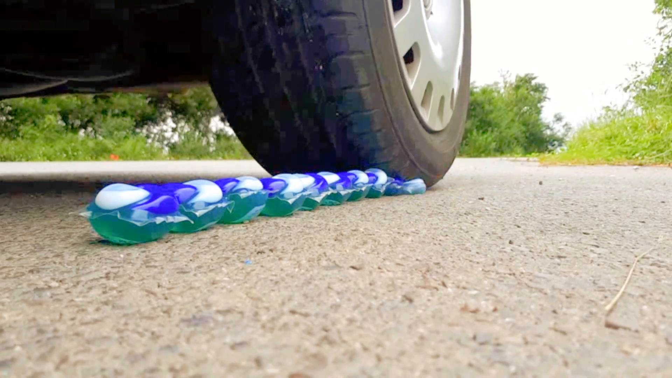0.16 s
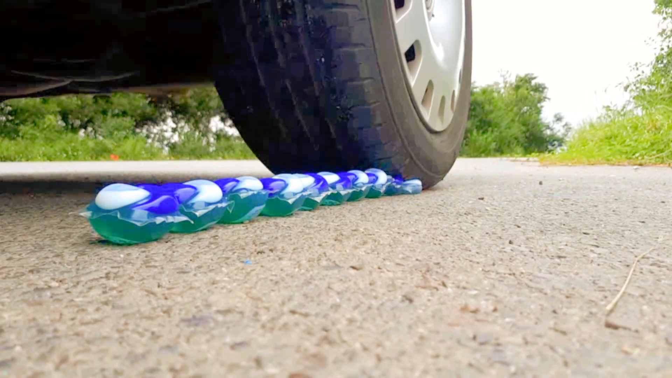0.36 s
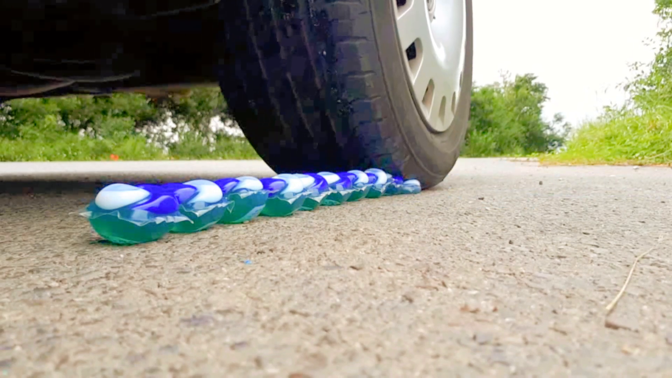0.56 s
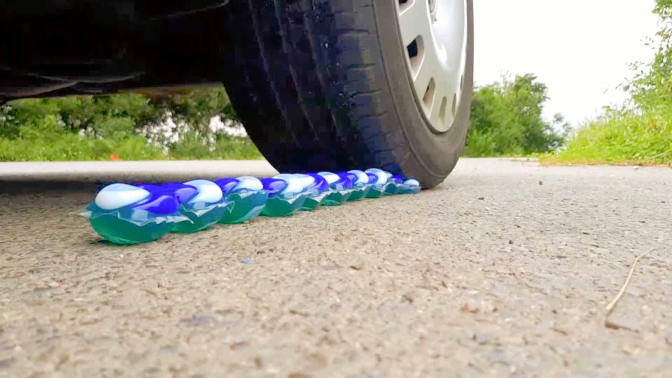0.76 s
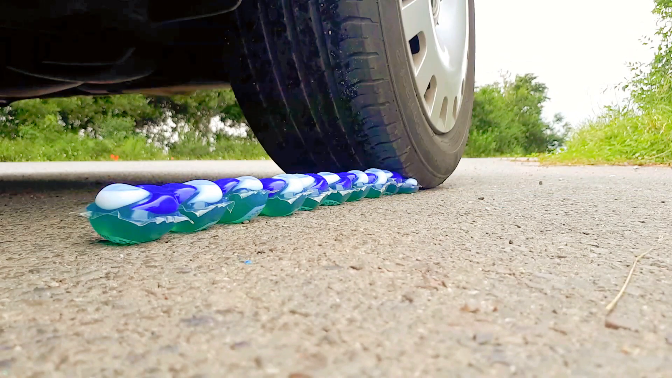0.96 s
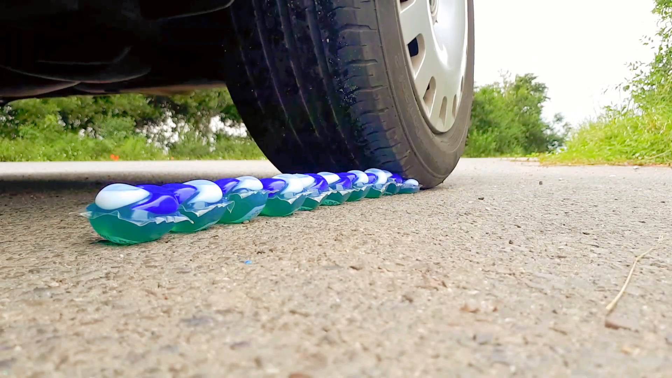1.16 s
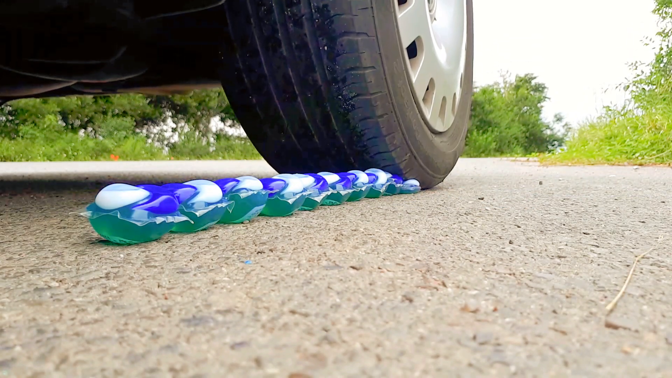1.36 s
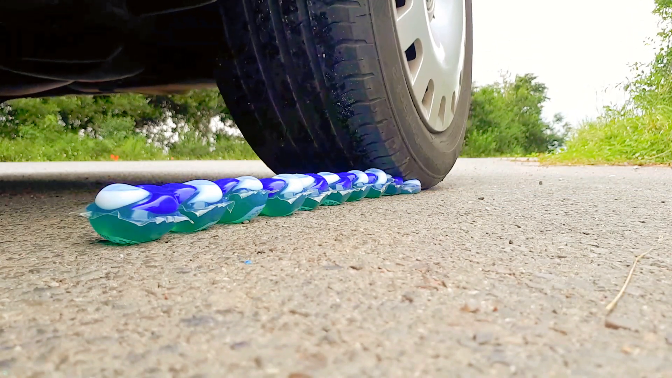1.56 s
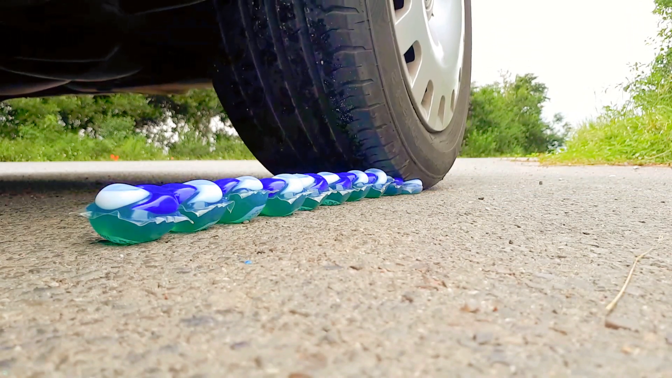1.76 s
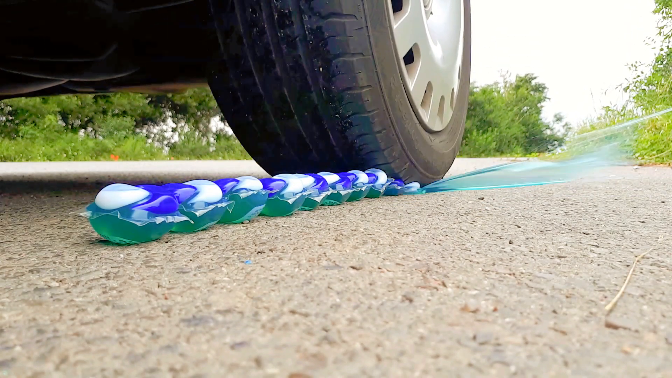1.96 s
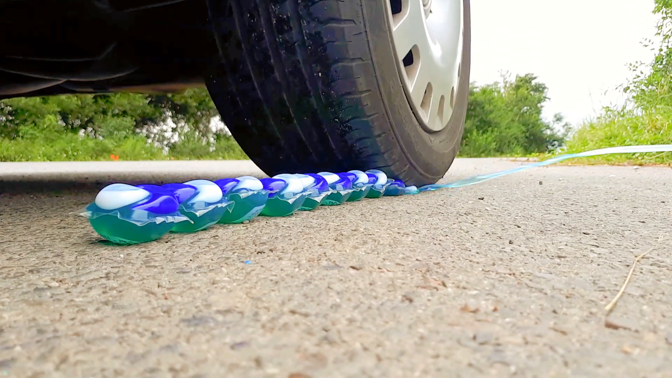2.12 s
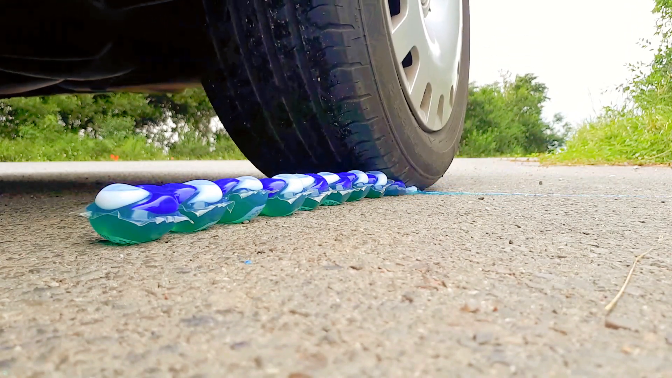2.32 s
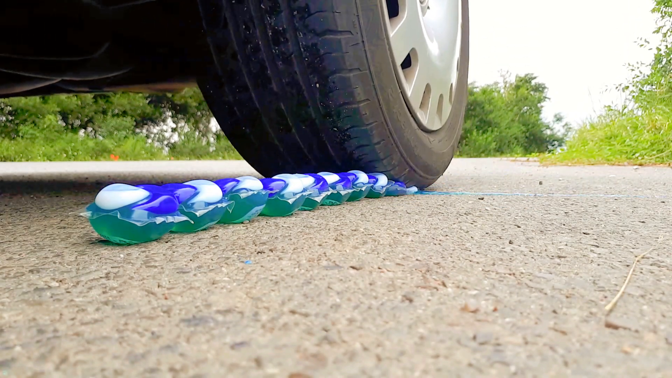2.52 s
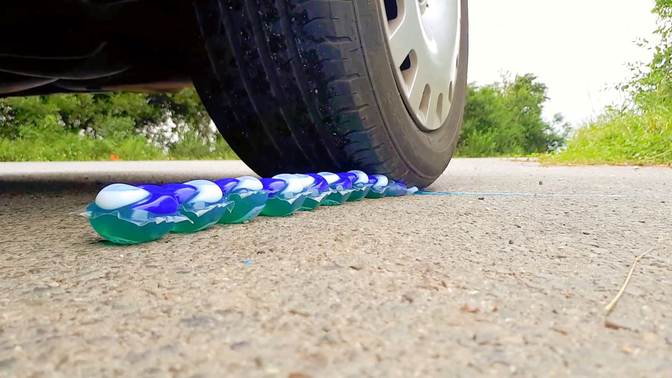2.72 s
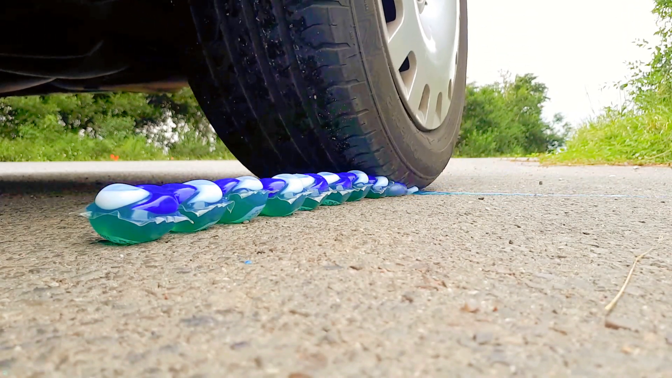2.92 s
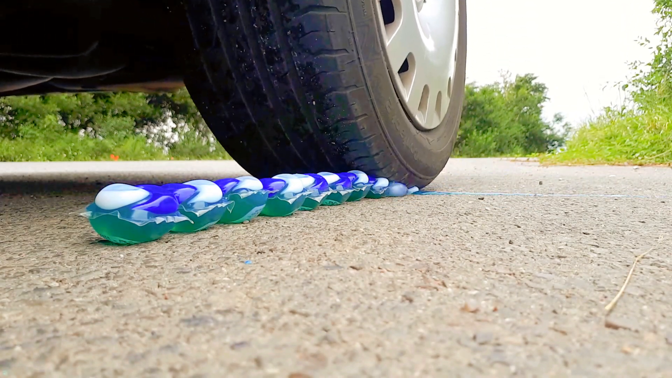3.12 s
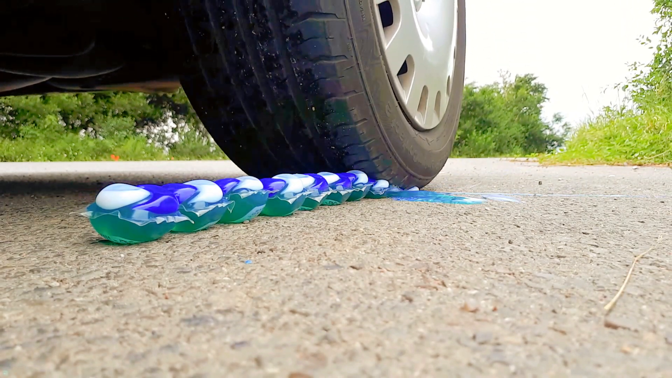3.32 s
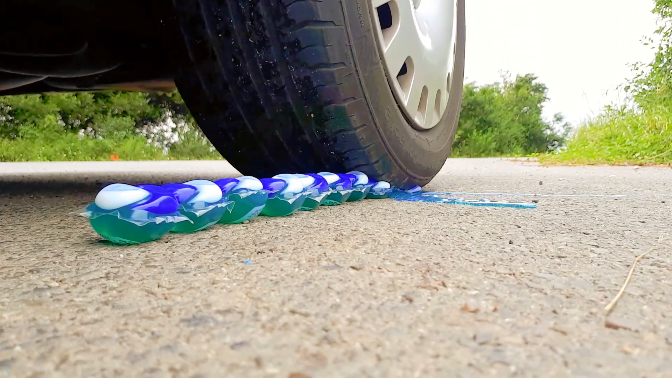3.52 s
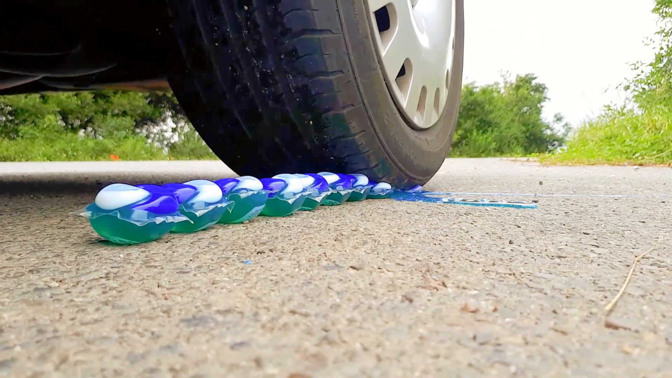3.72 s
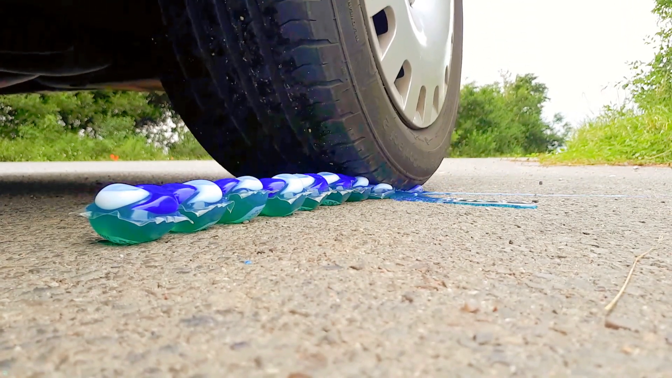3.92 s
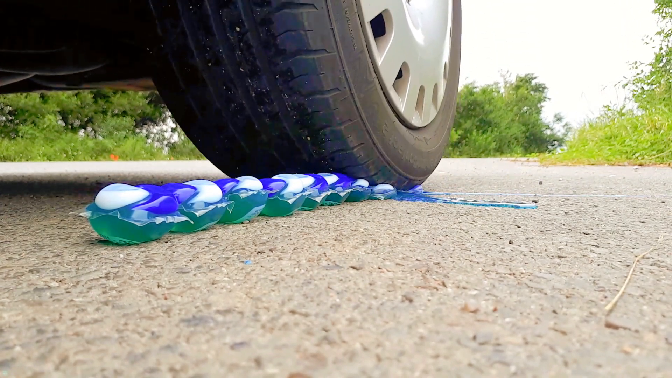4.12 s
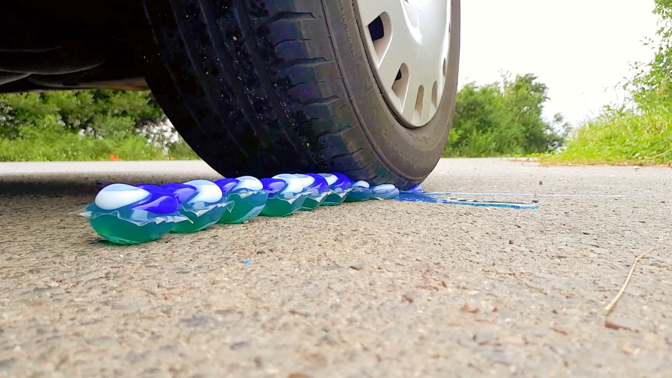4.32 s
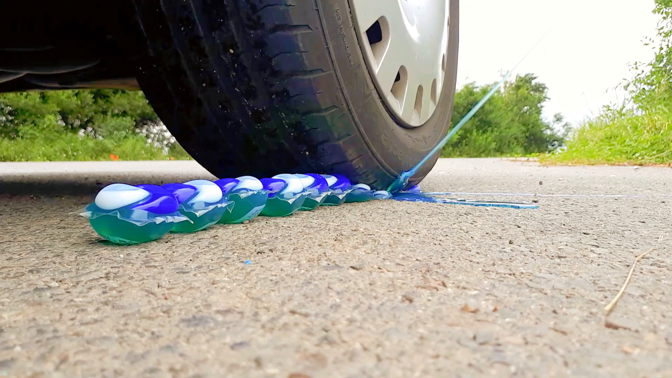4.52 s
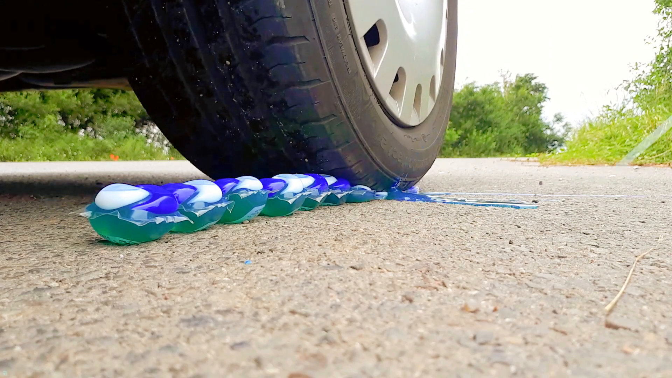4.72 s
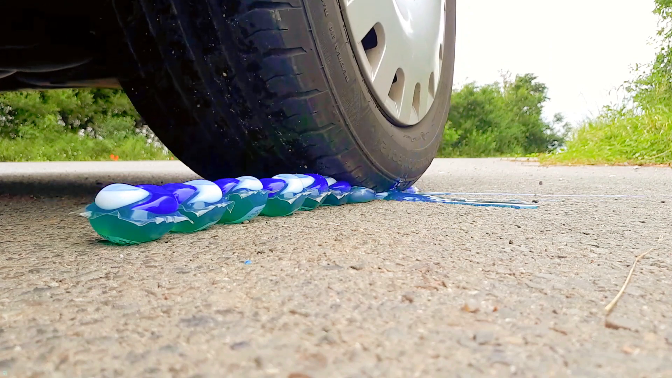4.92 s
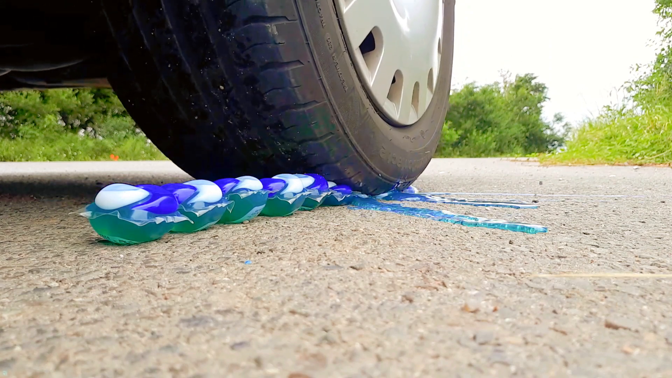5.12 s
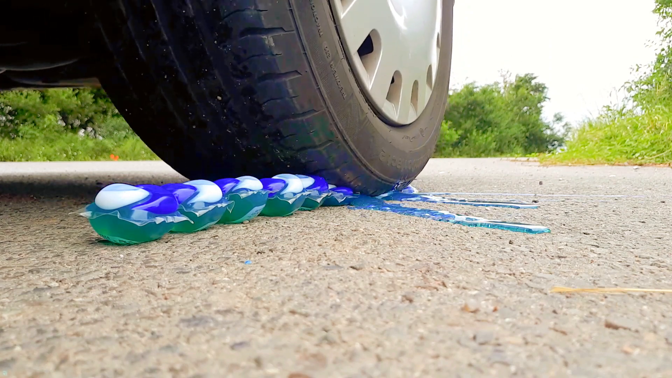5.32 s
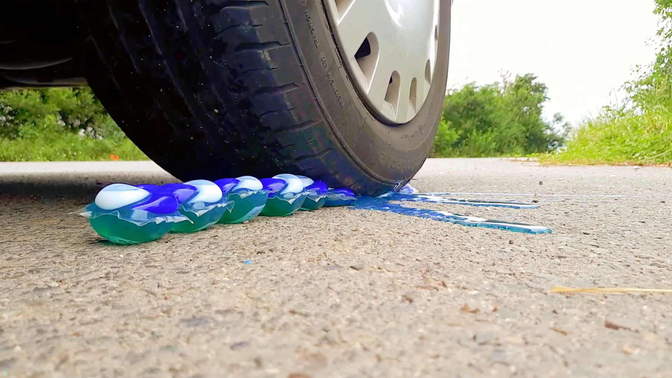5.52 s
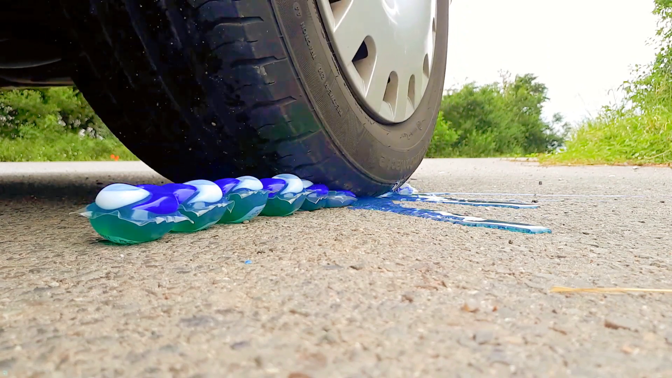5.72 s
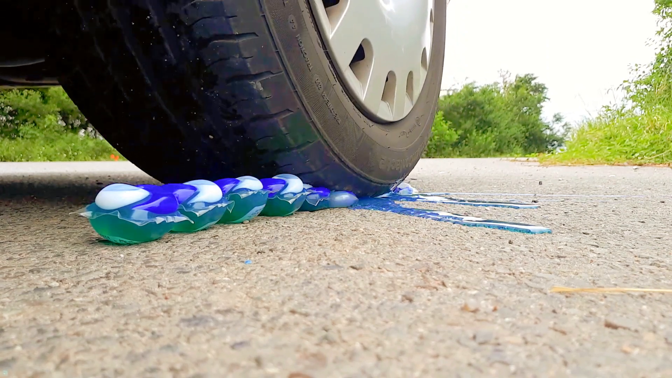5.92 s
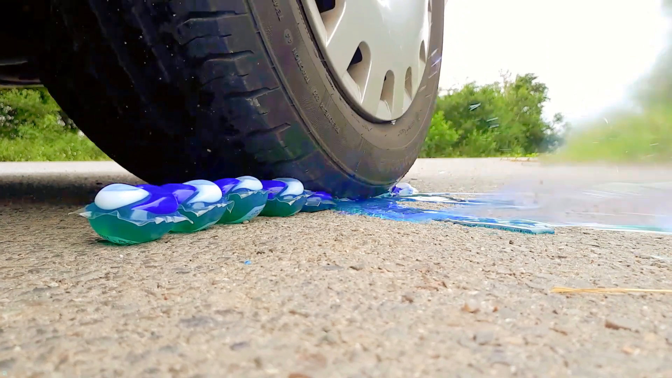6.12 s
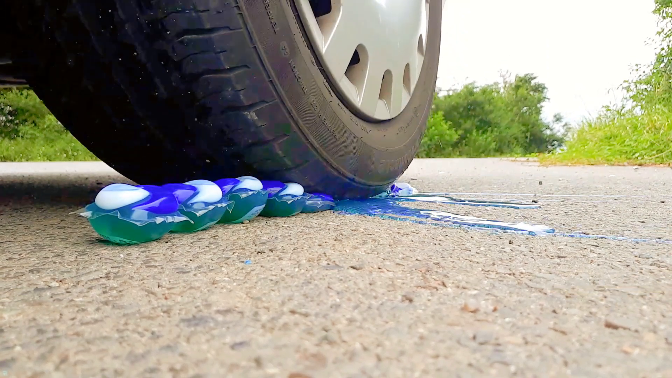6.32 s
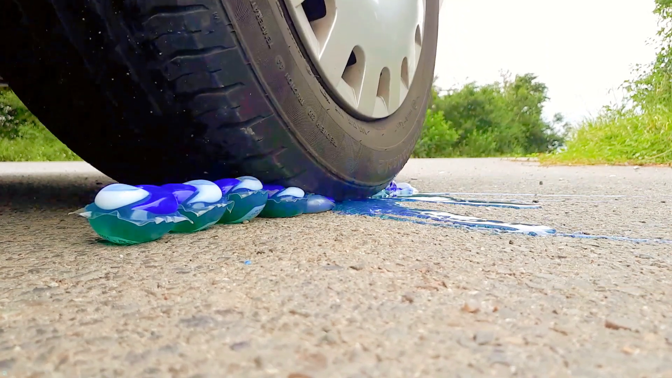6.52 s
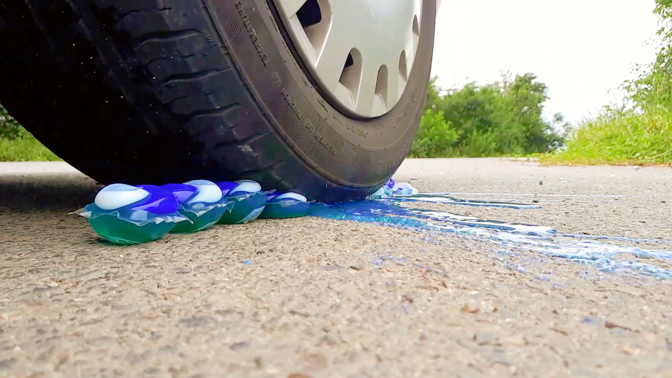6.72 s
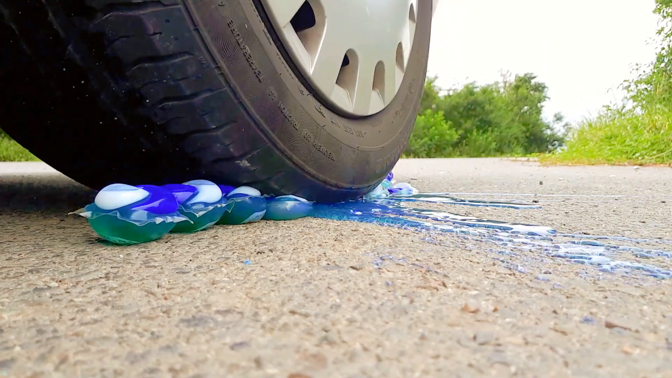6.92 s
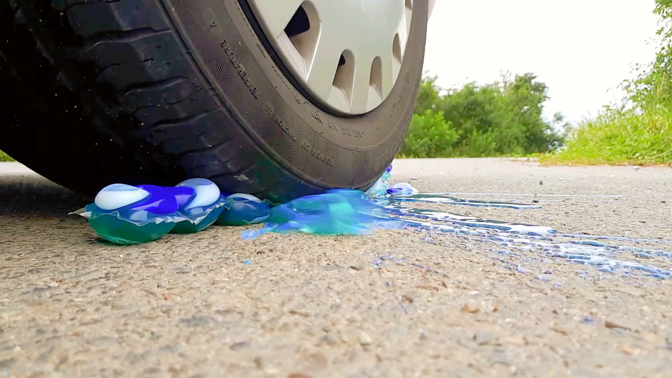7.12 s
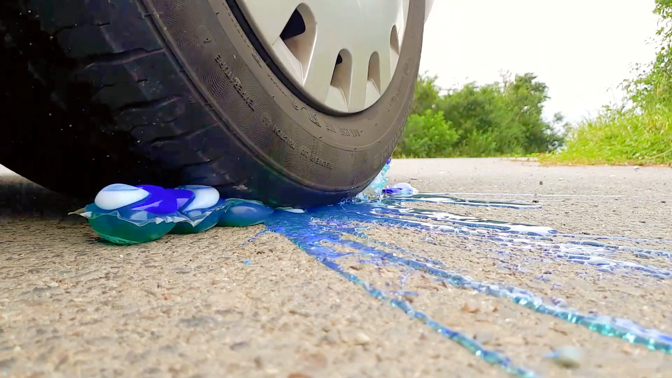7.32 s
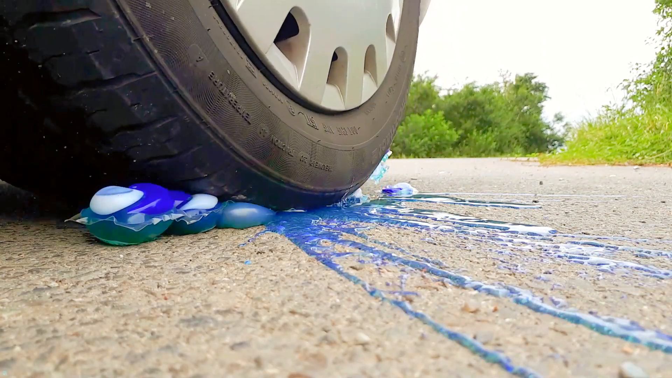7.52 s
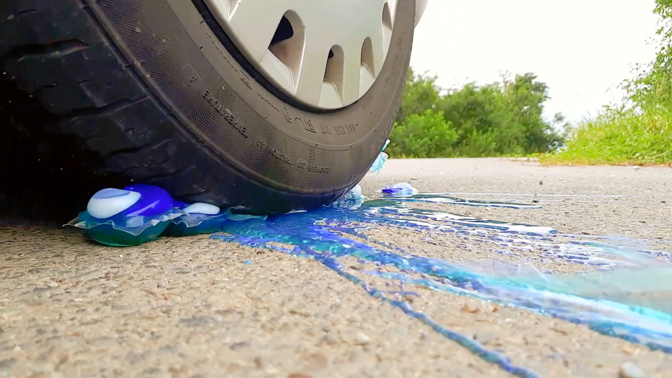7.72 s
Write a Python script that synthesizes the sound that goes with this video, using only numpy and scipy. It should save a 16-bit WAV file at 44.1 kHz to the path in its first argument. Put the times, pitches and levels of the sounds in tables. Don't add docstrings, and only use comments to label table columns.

```python
import sys
import numpy as np
from scipy import signal
from scipy.fft import rfft, irfft, next_fast_len
from scipy.io import wavfile
from scipy.ndimage import uniform_filter1d, map_coordinates

SR = 44100
rng = np.random.default_rng(int(sys.argv[2]) if len(sys.argv) > 2 else 0)


def int16_out(signal):
    q = np.round(np.clip(np.atleast_2d(signal).T, -1, 1) * 32767)
    wavfile.write(sys.argv[1], SR, q.astype(np.int16))


def linear_from_db(decibels):
    return 10 ** (np.asarray(decibels, float) / 20)


N = 346846

# start in seconds, peak in dB, pitch in Hz, echo delay in ms, step per echo in dB.
SNAPS = [(1.77091, -1.5, 2600, .2, -4.5), (1.7786, -9, 2500, .2, -3), (3.10445, -7, 2100, .85, -15),
         (4.1419, -3.5, 2700, .19, -3), (4.15126, -7, 2700, .19, -3.5), (4.84372, -10, 1600, .85, -16),
         (4.85803, -12, 1600, .85, -16), (5.86803, 0, 2100, .86, -14), (5.87706, -7, 2100, .85, -10),
         (6.4121, -5, 2000, .85, -13), (6.93443, -3, 2000, .54, -10), (7.4569, 0, 2000, .85, -14)]
# start in seconds, time until shut in ms, start and end pitch in Hz, level in dB.
WHOOPS = [
    (3.1068, 3.6, 1450, 2300, -7),
    (4.8456, 2.5, 1200, 2750, -9),
    (4.8599, 2.4, 1200, 2750, -9),
    (5.8688, 2.1, 1250, 2950, -8.5),
    (5.8778, 2, 1250, 2950, -10.5),
    (5.8868, 3.5, 1900, 2400, -12),
    (6.4141, 3.2, 1480, 2350, .3),
    (6.9367, 4.9, 1450, 2060, -6.5),
    (6.9432, 4.8, 1500, 2080, -11.5),
    (7.4588, 4.7, 1250, 2560, -13.5),
]
WHOOP_GROWS_DB = [-7, 4.5, 4.5, 6, 5.5, -2, -6, .4, 1.5, 7.5]
# start in seconds, level in dB.
JETS = [
    (1.767, -32.5),
    (3.1, -36),
    (4.138, -20),
    (4.8394, -35.5),
    (4.855, -41.5),
    (5.864, -41),
    (6.407, -36),
    (6.929, -29.5),
    (7.452, -32),
]
# frequency in Hz, level in dB.
JET_COLOUR = [(700, -5), (2000, 0), (4500, -10.5), (6500, -17.5), (8700, -33.5), (12500, -16.5),
              (15800, -23.5)]
# start in seconds, peak in dB, pitch in Hz.
CRACKS = [
    (1.771, -15, 5000),
    (1.7711, -33, 11500),
    (1.779, -25, 5200),
    (3.1074, -27, 4200),
    (4.142, -20, 5800),
    (4.1421, -30, 9500),
    (4.1422, -29, 13000),
    (4.1514, -24, 5600),
    (4.1515, -34, 9500),
    (4.1516, -33, 13000),
]
# start in seconds, peak in dB, pitch in Hz.
SLAPS = [(1.7771, -17.5, 2200), (1.785, -19.5, 2200), (1.7868, -15, 1900), (1.7882, -16, 2200),
         (1.7898, -18, 2200), (1.7912, -17, 2000), (1.7926, -18, 2200), (1.7948, -18, 2300),
         (3.106, -27, 750), (3.1128, -25.5, 800), (4.148, -23, 2900), (4.1575, -18.5, 2900),
         (4.1594, -16.5, 2300), (4.1605, -16.5, 2600), (4.1625, -18.5, 3100), (4.1645, -20.5, 2900),
         (4.1665, -19, 3200), (4.174, -23.5, 3000), (4.18, -25.5, 3000), (4.189, -24.5, 2900),
         (4.2, -27, 2900), (4.204, -25.5, 3000), (4.8445, -23, 650), (4.8588, -23.5, 650),
         (6.4135, -24, 700), (6.936, -23, 700), (7.458, -21, 750), (7.4618, -22.5, 800)]

# start in seconds, then underbody echo, tyre ring, air-cavity note and
# air push, all in dB.
BURSTS = [
    (1.7714, -7, -32.5, -66, -22.5),
    (3.104, -13, -36.5, -55.5, -38),
    (4.14, -3, -26.5, -63, -46),
    (4.8443, -14, -37.5, -53, -49.5),
    (5.869, -9.5, -28.5, -46, -29),
    (6.413, -10.5, -33, -45.5, -40),
    (6.9346, -15, -35.5, -48.5, -40),
    (7.4575, -13, -31, -42, -30.5),
]
# frequency in Hz, level in dB, decay over 60 dB in seconds.
TYRE_MODES = [(86.5, 0, 0.15), (117.6, 2.5, 0.13), (139, -8, 0.069), (320.5, -1, 0.25), (650, -9.5, 0.066),
              (927, 1.5, 0.092)]
# frequency in Hz, decay over 60 dB in seconds.
UNDERBODY_DECAY = [(200, 0.58), (420, 0.12), (1100, 0.045), (3000, 0.12), (9000, 0.071)]
# frequency in Hz, level in dB.
ARCH_COLOUR = [(300, -6.5), (900, 4), (1700, -8), (2400, -13.5), (4200, -12.5), (7000, -28), (12000, -28.5)]
# start in seconds, pitch in Hz, level in dB, decay over 60 dB in seconds.
THUMP = (4.1373, 107, -16, .1)

# peak time in seconds, level in dB, rise and fall over 20 dB in ms,
# gurgle over squelch in dB.
GUSHES = [(1.778, -22.5, 2.3, 45, -1.5), (1.794, -24.5, 44, 37, -7), (1.93, -60.5, 90, 31, -8),
          (3.14, -56.5, 14, 130, 0.5), (3.33, -71, 136, 75, 0.5), (4.161, -24.5, 7, 35, -10),
          (4.205, -35.5, 44, 41, 6), (4.29, -64.5, 93, 71, 2), (4.89, -50, 31, 37, 5.5),
          (4.95, -66, 45, 250, -4.5), (5.894, -30.5, 94, 40, 3.5), (6.449, -49.5, 17, 62, -0.5),
          (6.494, -57.5, 34, 58, -2.5), (6.969, -60.5, 40, 120, 7), (7.045, -57, 170, 94, -2.5),
          (7.49, -44, 25, 71, 1.5), (7.586, -62.5, 120, 66, 4.5)]
# peak time in seconds, level in dB, rise and fall over 20 dB in ms,
# gurgle over squelch in dB.
SQUEEZES = [(.19, -70, 160, 12, -9), (.295, -62, 37, 13, -14), (1.367, -61.5, 5.4, 52, -16),
            (1.496, -61.5, 5.3, 80, -8), (2.603, -53.5, 19, 58, -3), (5.098, -57, 15, 240, -4),
            (5.173, -51.5, 9, 46, -2.5), (5.325, -58.5, 30, 170, -1), (5.362, -48.5, 9, 42, -2.5),
            (5.482, -61, 100, 200, -22), (5.538, -52.5, 150, 110, -7), (5.594, -47, 98, 49, -2.5),
            (5.729, -53, 26, 340, 0), (5.783, -49, 63, 23, -4), (6.014, -63, 270, 620, -5.5),
            (6.096, -56.5, 140, 56, -9.5), (6.145, -63, 29, 130, -3), (6.605, -70, 137, 120, -1.5),
            (6.74, -66, 80, 140, -7.5), (7.21, -74.5, 25, 164, 13.5), (7.685, -70, 15, 300, 10),
            (7.748, -57, 103, 1300, -1.5), (7.851, -41, 30, 42, -4.5)]
# peak time in seconds, level in dB, rise and fall over 20 dB in ms,
# spray over fizz in dB.
SQUIRTS = [(.19, -70, 58, 8, -41.5), (.295, -69.5, 68, 12, -40), (1.367, -69, 4, 83, -8),
           (1.496, -76, 4, 200, -5.5), (1.7775, -24, 1.7, 32, -15.5), (3.313, -86, 40, 32, 18),
           (4.14, -33.5, 1.2, 3, -10), (4.163, -30.5, 7.5, 34, -9.5), (4.204, -53, 28, 24, -2),
           (5.8, -82, 70, 200, -13), (6.014, -55.5, 61, 110, -4), (6.071, -55, 70, 12, -4),
           (6.096, -40, 11, 14, -2), (6.145, -50, 20, 19, -2), (6.494, -63, 60, 62, 0.5),
           (6.713, -64.5, 11, 50, -8.5), (7.005, -74.5, 21, 170, -7), (7.045, -63, 94, 115, -3.5),
           (7.49, -59, 8.7, 25, -26), (7.586, -68.5, 140, 70, 0.5), (7.748, -78, 50, 300, 3)]
# peak time in seconds, level in dB, rise and fall over 20 dB in ms.
MISTS = [
    (4.73, -80, 40, 60),
    (6.5, -68, 52, 70),
    (7.0, -64, 9.1, 107),
    (7.73, -71.5, 25, 900),
    (7.85, -73, 100, 100),
]
# frequency in Hz, level in dB.
GURGLE_COLOUR = [(300, -5.5), (550, -3.5), (950, -2), (1300, -3.5), (1700, -18)]
SQUELCH_COLOUR = [(1100, -19.5), (1500, -1.5), (2200, 1), (3100, -2.5), (4000, -8), (5500, -23.5)]
FIZZ_COLOUR = [(3000, -25.5), (4200, 1), (5500, 1), (7000, -11.5), (8600, -19.5), (9500, -42)]
SPRAY_COLOUR = [(8000, -26), (10000, -3.5), (12500, -2), (15600, -1), (16100, -29)]
MIST_COLOUR = [(11500, -28), (13200, -3.5), (15600, 2.5), (16100, -28.5)]

# start in seconds, peak in dB, pitch in Hz.
BUBBLES = [(3.25, -61.5, 2700), (3.33, -54, 988), (3.35, -60, 990), (3.84, -61, 990), (4.013, -57, 1050),
           (4.028, -56.5, 1050), (4.045, -62, 1000), (4.203, -29, 800), (4.208, -29, 933),
           (4.214, -33, 795), (4.222, -35.5, 902), (5.096, -53.5, 2030), (5.112, -54, 2000),
           (5.156, -50, 885), (5.171, -43, 1900), (5.171, -41, 2970), (5.172, -53, 4700), (5.176, -51, 800),
           (5.311, -56, 2000), (5.328, -51, 2000), (5.359, -41, 2820), (5.36, -43, 1900),
           (5.361, -43.5, 580), (5.438, -58, 2670), (5.531, -47, 600), (5.532, -48, 2600),
           (5.545, -50, 2500), (5.566, -44, 2600), (5.569, -48, 1090), (5.604, -41, 2790),
           (5.706, -56, 700), (5.718, -46.5, 590), (5.727, -39, 1510), (5.728, -44, 950), (5.778, -48, 940),
           (5.805, -52.5, 787), (6.492, -50, 4200), (6.492, -55, 6200), (7.079, -56, 2100),
           (7.196, -49.5, 852), (7.2035, -55, 860), (7.21, -46, 930), (7.219, -52, 1010),
           (7.203, -63, 1970), (7.211, -55, 1990), (7.221, -53, 2030), (7.23, -60, 2000), (7.272, -61, 804),
           (7.681, -58, 2194), (7.796, -51, 900), (7.816, -48, 650), (7.85, -32, 2466), (7.851, -37.5, 600)]
# start in seconds, peak in dB, pitch in Hz.
GRIT = [(0.191, -40, 2620), (0.296, -43.5, 2440), (1.365, -43, 2530), (1.494, -38, 4000), (2.39, -57, 1515),
        (2.43, -58, 1300), (2.594, -46.5, 1296), (3.253, -60, 2615), (5.095, -50.5, 2020),
        (5.156, -43.5, 940), (5.17, -46, 846), (5.359, -51, 2840), (5.647, -41, 920), (5.706, -44.5, 750),
        (5.728, -36.5, 1040), (5.992, -37.5, 3650), (6.209, -42.5, 3160), (6.228, -44, 3120),
        (6.602, -47, 830), (6.603, -40, 1850), (6.713, -37, 4300), (6.74, -43.5, 2140), (7.105, -43, 4070),
        (7.205, -42, 940), (7.844, -30, 2440), (7.849, -35.5, 700)]
# start in seconds, peak in dB, pitch in Hz.
DROPS = [(3.3104, -64.5, 11000), (6.0731, -40, 11900), (6.09, -33, 11340), (6.097, -32, 11500),
         (6.1104, -38, 11500), (6.1419, -46, 11700), (6.5091, -40, 15000), (6.5214, -42.5, 15400),
         (6.7121, -41.5, 12200), (6.989, -31.5, 12660), (7.0, -24.5, 13300), (7.5462, -49, 12220),
         (7.7154, -44, 10800)]
# start in seconds, length in ms, start and end pitch in Hz,
# level in dB.
WHISTLES = [(3.235, 45, 2700, 2700, -66), (5.44, 55, 2700, 2600, -59), (5.55, 45, 2600, 2650, -58),
            (5.95, 50, 6120, 6500, -57), (5.995, 85, 8900, 7200, -57), (6.05, 110, 875, 914, -58.5),
            (6.425, 65, 1900, 1750, -50), (6.6, 200, 2030, 2100, -75), (6.8, 125, 2100, 2000, -72),
            (7.15, 140, 2030, 2100, -74), (7.712, 14, 11400, 10200, -62)]

# frequency in Hz, level in dB.
LEAK_COLOUR = [(20, -24), (250, -27), (1000, -34), (3000, -36), (6000, -42), (9000, -70)]
# time in seconds, level in dB.
BREEZE = [(0, -59.5), (.27, -53.5), (.54, -63.5), (.73, -47.5), (1.08, -65), (1.4, -54), (1.74, -63),
          (1.83, -44), (2.03, -69.5), (2.45, -70), (2.73, -52.5), (3.05, -71.5), (3.3, -53.5),
          (5.85, -55.5), (5.96, -40), (6.05, -60), (7.54, -53), (7.86, -53)]
# peak time in seconds, level in dB, rise and fall over 20 dB in ms.
GUSTS = [(.27, -48.5, 150, 60), (.44, -43.5, 120, 39), (.54, -42.5, 59, 21), (.73, -36.5, 102, 234),
         (1.08, -43.5, 63, 35), (1.2, -44.5, 76, 143), (1.4, -49.5, 52, 460), (2.45, -55, 64, 210),
         (2.87, -50, 123, 260), (3.24, -42, 270, 400), (3.68, -35, 590, 300), (3.99, -35.5, 99, 200),
         (4.28, -35, 330, 35), (4.66, -37.5, 330, 380), (5.33, -41, 85, 184), (5.67, -39, 190, 330),
         (5.95, -41, 320, 55), (6.42, -46.5, 310, 300), (6.74, -39, 103, 99), (7.13, -46, 540, 410),
         (7.47, -44, 49, 280), (7.72, -42, 530, 530)]
# frequency in Hz, level in dB.
BUFFET_COLOUR = [(15, -22), (43, -12), (65, -2.5), (90, 3), (130, -1.5), (180, -6), (250, -15),
                 (350, -25.5), (500, -42.5), (700, -61)]
# time in seconds, level in dB.
HISS_LEVEL = [(0, -83), (1.7, -83), (1.9, -88.5), (2.4, -91), (3.15, -94), (3.35, -84.5), (4.1, -83),
              (4.45, -88), (5.4, -93), (5.6, -91), (5.8, -85), (6.15, -95), (6.35, -99.5), (6.6, -90),
              (7.1, -95.5), (7.4, -85.5), (7.82, -90)]
# frequency in Hz, level in dB.
HISS_COLOUR = [(200, 7), (700, 11), (2000, 5), (4000, 0), (8000, -1.5), (12000, 0.5), (15650, 1),
               (16000, -27)]

OPEN_S, SHUT_S = .0005, .0003
AFTER_DB, AFTER_S = -8, .0011
CAVITY_HZ, CAVITY_T60 = 239.6, 1
ECHO_RISE_S = .003
DRAIN = 5.9
FIZZ_SHARE_DB, SPRAY_SHARE_DB = -24.5, -33
SEEP_DB = 5.5
WINDWARD_DB = -4.5
SPLICE_S, EARLY_TOP_HZ = .69, 7660


def snaps():
    out, t = np.zeros(N), np.arange(SR // 100) / SR
    for s, db, hz, delay_ms, echo_db in SNAPS:
        flip = -1 if delay_ms < .3 else 1
        for k in range(4):
            turn = np.clip((t - k * delay_ms / 1000) * hz, 0, 1)
            pulse = np.sin(2 * np.pi * turn ** .7) * (1 - turn ** 3)
            add(out, s, flip ** k * linear_from_db(db + k * echo_db) * pulse)
    return out


def whoops():
    out, t = np.zeros(N), np.arange(SR // 100) / SR
    for (s, length_ms, start_hz, end_hz, db), grows_db in zip(WHOOPS, WHOOP_GROWS_DB):
        u = t * 1000 / length_ms
        slow_start = 1 - .55 * np.exp(-t / .0004)
        hz = (start_hz + (end_hz - start_hz) * u) * slow_start
        late = np.maximum(t - length_ms / 1000, 0)
        shut = np.maximum(np.exp(-late / SHUT_S), linear_from_db(AFTER_DB) * np.exp(-(late / AFTER_S) ** 2))
        swell = (1 - np.exp(-(t / OPEN_S) ** 2)) * linear_from_db(grows_db * np.minimum(u, 1)) * shut
        add(out, s, -linear_from_db(db) * swell * np.sin(2 * np.pi * np.cumsum(hz) / SR))
    return out


def jets():
    out, t = np.zeros(N), np.arange(SR // 8) / SR
    for s, db in JETS:
        onset = 1 - np.exp(-(t / .0037) ** 2)
        hiss = unit(coloured(rng.standard_normal(len(t)), JET_COLOUR))
        add(out, s, linear_from_db(db - 60 * t / .076) * onset * hiss)
    return out


def underbody_tail():
    hz, when, z = signal.stft(rng.standard_normal(SR // 2), SR, nperseg=256)
    fade_db = 60 * when / along(UNDERBODY_DECAY, hz)[:, None]
    z = z * linear_from_db(along(ARCH_COLOUR, hz)[:, None] - fade_db)
    tail = signal.istft(z, SR, nperseg=256)[1]
    t = np.arange(len(tail)) / SR
    tail = tail * (1 - np.exp(-(t / ECHO_RISE_S) ** 2))
    return tail / np.linalg.norm(tail)


def car(pops):
    out, t = np.zeros(N), np.arange(SR) / SR
    for s, echo_db, ring_db, cavity_db, push_db in BURSTS:
        burst = pops[round(s * SR) - 20:][:SR // 30]
        add(out, s + .002, linear_from_db(echo_db) * signal.fftconvolve(burst, underbody_tail()))
        ring = np.zeros(len(t))
        for mode_hz, db, t60 in TYRE_MODES:
            hz = mode_hz * rng.uniform(.95, 1.05)
            ring += linear_from_db(ring_db + db - 60 * t / t60) * np.sin(2 * np.pi * hz * t)
        note = linear_from_db(cavity_db - 60 * t / CAVITY_T60) * np.sin(2 * np.pi * CAVITY_HZ * t)
        add(out, s, (ring + note) * (1 - np.exp(-t / .0016)))
        u = t / .003
        add(out, s, linear_from_db(push_db) * u * (2 - u) * np.exp(-u))
    s, hz, db, t60 = THUMP
    add(out, s, -linear_from_db(db - 60 * t / t60) * (1 - np.exp(-t / .003)) * np.sin(2 * np.pi * hz * t))
    return out


def gel():
    seep = linear_from_db(curve(HISS_LEVEL) + SEEP_DB)
    opened = [s for s, db in JETS]
    thick = np.hypot(swells(GUSHES, False, opened), swells(SQUEEZES))
    deep = np.hypot(swells(GUSHES, True, opened), swells(SQUEEZES, True))
    thin = swells(SQUIRTS) + linear_from_db(FIZZ_SHARE_DB) * thick
    fine = swells(SQUIRTS, True) + linear_from_db(SPRAY_SHARE_DB) * thick
    out = (deep + seep) * patchy(GURGLE_COLOUR, 150, depth_db=2.5, patch_db=-1.5)
    out += (thick + seep) * patchy(SQUELCH_COLOUR, 380, depth_db=2.5, patch_db=1.5)
    out += thin * patchy(FIZZ_COLOUR, 220, depth_db=3, patch_db=2)
    out += fine * patchy(SPRAY_COLOUR, 170, depth_db=3.5, patch_db=1.5)
    return out + swells(MISTS) * patchy(MIST_COLOUR, 170, depth_db=2.5, patch_db=2.5)


def patchy(spectrum, rate, depth_db, patch_db):
    grains = rng.standard_normal(N) * linear_from_db(depth_db * wobble(rate))
    z = signal.stft(grains, nperseg=256)[2]
    field = uniform_filter1d(rng.standard_normal(z.shape), size=3, axis=0)
    field = uniform_filter1d(field, size=8, axis=1)
    wet = signal.istft(z * linear_from_db(patch_db * unit(field)), nperseg=256)[1][:N]
    return unit(coloured(wet, spectrum))


def swells(rows, tilted=False, opened=(0,)):
    t, power = np.arange(0, N + 16, 16) / SR, 0
    for s, db, rise_ms, fall_ms, *tilt_db in rows:
        away_ms = np.abs(t - s) * 1000
        opening = max(start for start in opened if start <= s)
        rise = linear_from_db(-20 * away_ms / rise_ms) * (t > opening)
        fall = (1 + (10 ** (1 / DRAIN) - 1) * away_ms / fall_ms) ** -DRAIN
        level = linear_from_db(db + tilted * sum(tilt_db))
        power = power + (level * np.where(t < s, rise, fall)) ** 2
    return np.interp(np.arange(N) / SR, t, np.sqrt(power))


def ticks(table, cycles):
    out, t = np.zeros(N), np.arange(SR // 50) / SR
    for s, db, hz in table:
        decay = np.exp(-t * hz / cycles) * (1 - np.exp(-t * hz * 6))
        tone = np.sin(2 * np.pi * hz * t) + .08 * rng.standard_normal(len(t))
        add(out, s, linear_from_db(db + 8.5) * decay * tone)
    return out


def whistles():
    out = np.zeros(N)
    flutter = linear_from_db(4 * wobble(60)) * (.35 + wobble(260))
    waver = 1 + .03 * wobble(700)
    for s, length_ms, start_hz, end_hz, db in WHISTLES:
        u = np.linspace(0, 1, round(length_ms * SR / 1000))
        hz = (start_hz + (end_hz - start_hz) * u) * waver[round(s * SR):][:len(u)]
        add(out, s, linear_from_db(db) * np.sin(np.pi * u) ** .5 * np.sin(2 * np.pi * np.cumsum(hz) / SR))
    return out * flutter


def port(x):
    body = signal.sosfilt(signal.butter(4, 4700, fs=SR, output="sos"), x)
    top = signal.sosfilt(signal.butter(3, [10500, 16000], "band", fs=SR, output="sos"), x)
    return body + linear_from_db(-18) * top


def wind():
    lumps = linear_from_db(3.5 * np.array([wobble(22), wobble(22)]))
    left, right = lumps * coloured(rng.standard_normal((2, N)), BUFFET_COLOUR)
    breeze, gusts = linear_from_db(curve(BREEZE)), swells(GUSTS)
    edge = linear_from_db(12) * gusts ** 1.56 * unit(np.gradient(right))
    windward = np.hypot(linear_from_db(WINDWARD_DB) * breeze, gusts)
    return np.array([breeze * unit(left), windward * unit(right) + edge])


def hiss(shape):
    noise = coloured(rng.standard_normal(shape), HISS_COLOUR)
    return linear_from_db(curve(HISS_LEVEL) + 8) * noise / np.std(noise)


def unit(x):
    return x / np.sqrt(np.mean(x ** 2) + 1e-20)


def along(points, hz):
    f, v = np.transpose(points)
    return np.interp(np.log(hz + 1), np.log(f + 1), v)


def curve(rows):
    s, value = np.transpose(rows)
    return np.interp(np.arange(N) / SR, s, value)


def wobble(rate):
    knots = rng.standard_normal(int(N * rate / SR) + 4)
    return map_coordinates(knots, [np.arange(N) * rate / SR])


def coloured(x, spectrum):
    m = next_fast_len(x.shape[-1] + 8192)
    closed = [(spectrum[0][0] / 2, -120), *spectrum, (spectrum[-1][0] * 1.2, -120)]
    gain = linear_from_db(along(closed, np.fft.rfftfreq(m, 1 / SR)))
    return irfft(rfft(x, m) * gain, m)[..., :x.shape[-1]]


def add(track, s, sound):
    part = track[round(s * SR):][:len(sound)]
    part += sound[:len(part)]


def scene():
    pops = snaps() + whoops()
    impacts = ticks(GRIT, .55) + linear_from_db(-6) * ticks(BUBBLES, 4) + linear_from_db(-5) * ticks(SLAPS, 2.2)
    near = port(pops + car(pops) + impacts)
    near = near + ticks(CRACKS, 1.2) / 2 + jets() + gel()
    near = near + coloured(np.roll(ticks(DROPS, 3), 55), SPRAY_COLOUR)
    shaded = coloured(np.roll(near, 4), LEAK_COLOUR)
    return np.array([near + whistles(), shaded]) + wind()


def roll_off(x):
    return signal.sosfilt(signal.butter(12, 16990, fs=SR, output="sos"), x)


def record(dry):
    x = dry + hiss(dry.shape)
    dull = signal.sosfiltfilt(signal.butter(12, EARLY_TOP_HZ, fs=SR, output="sos"), x)
    x = np.where(np.arange(N) < SPLICE_S * SR, dull, x)
    return roll_off(x)


dry = scene()
out = record(dry)
int16_out(out)
```